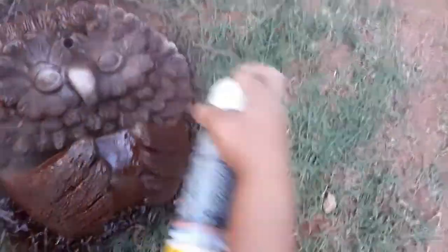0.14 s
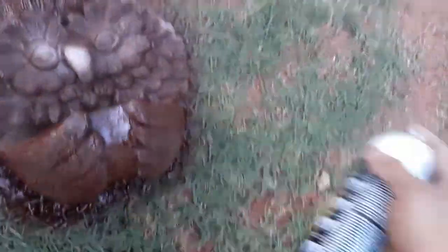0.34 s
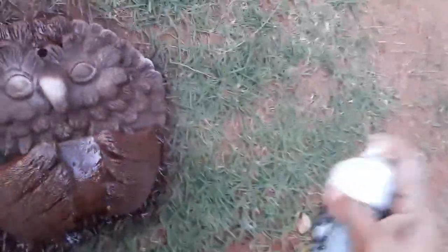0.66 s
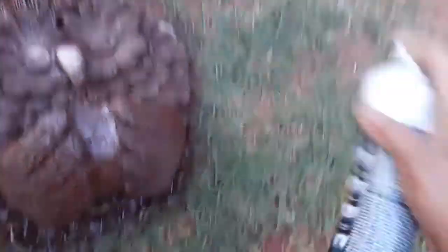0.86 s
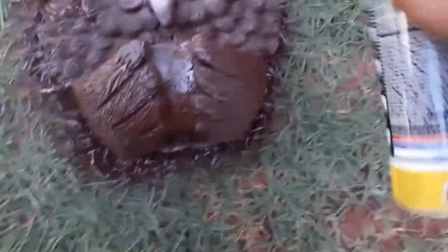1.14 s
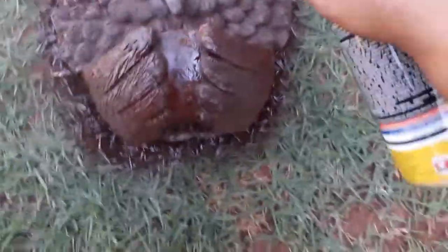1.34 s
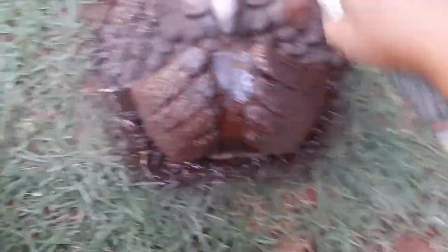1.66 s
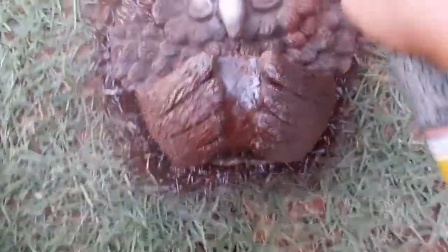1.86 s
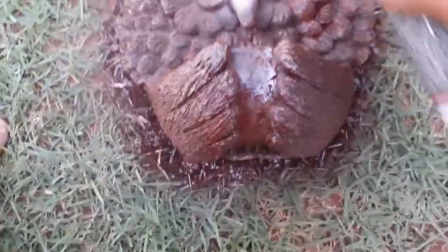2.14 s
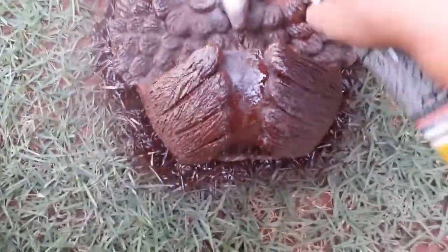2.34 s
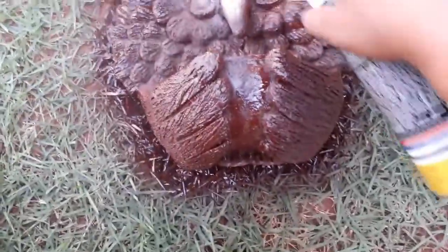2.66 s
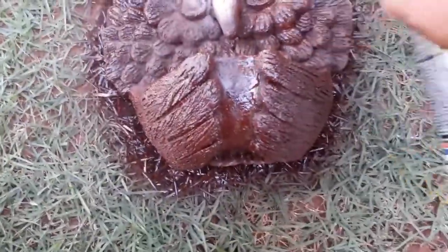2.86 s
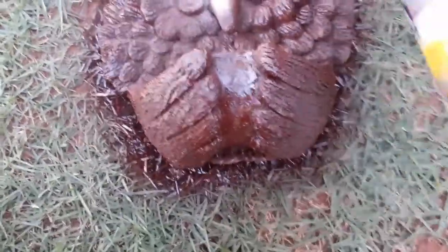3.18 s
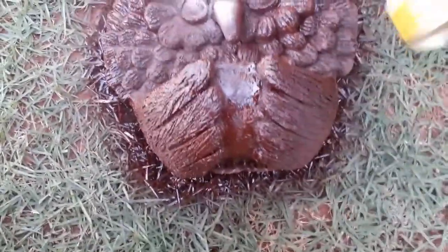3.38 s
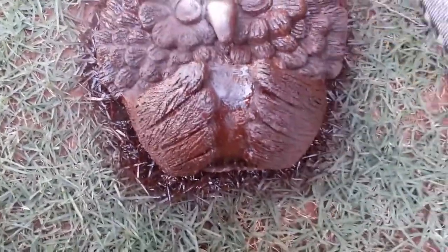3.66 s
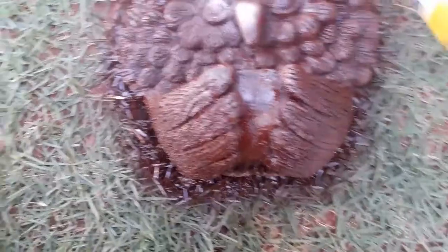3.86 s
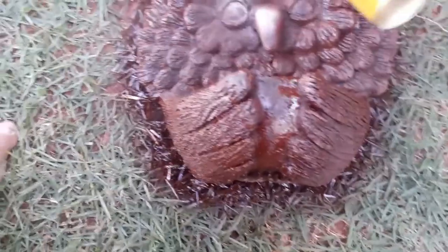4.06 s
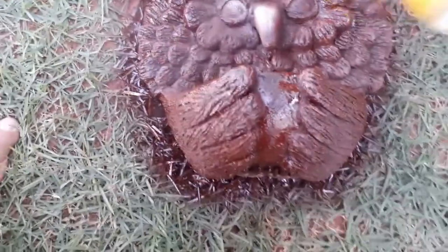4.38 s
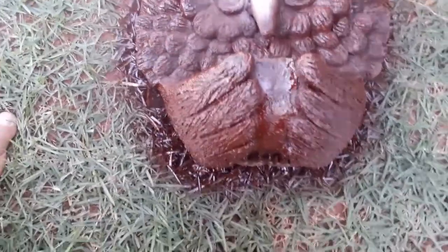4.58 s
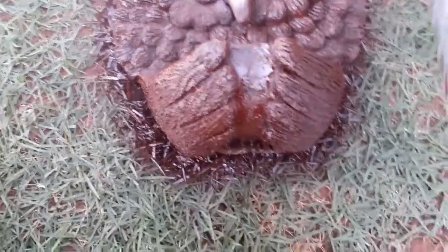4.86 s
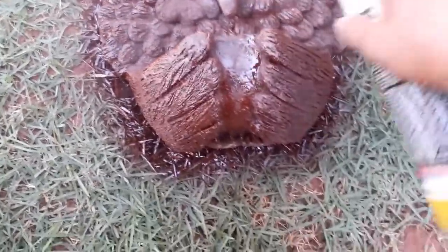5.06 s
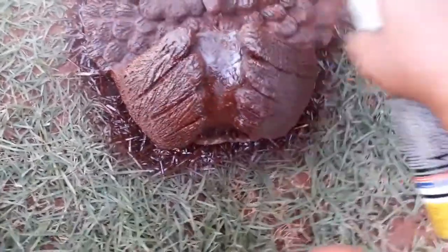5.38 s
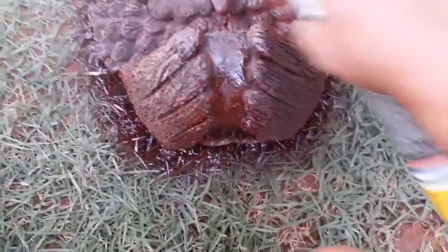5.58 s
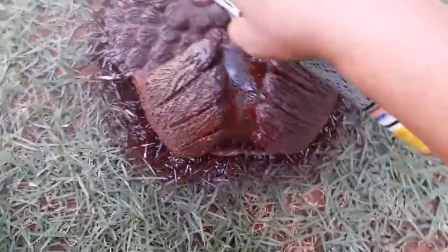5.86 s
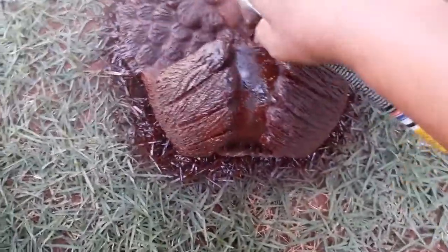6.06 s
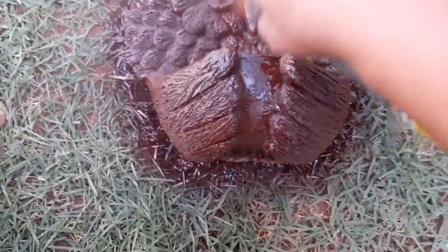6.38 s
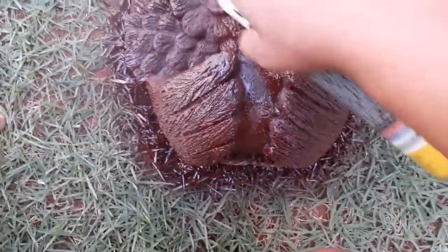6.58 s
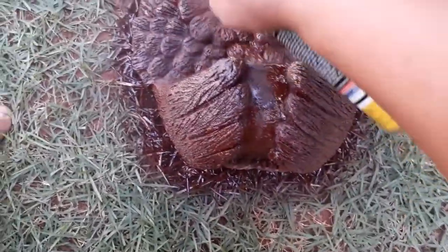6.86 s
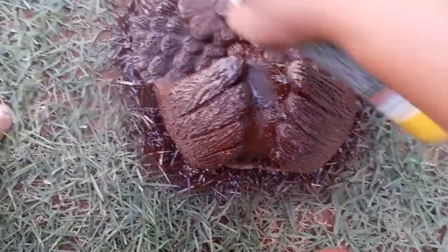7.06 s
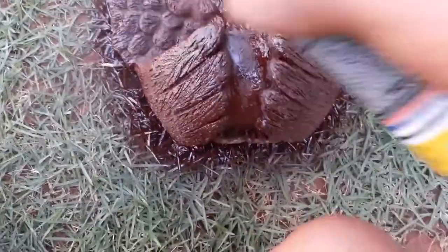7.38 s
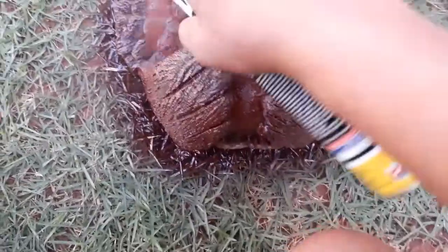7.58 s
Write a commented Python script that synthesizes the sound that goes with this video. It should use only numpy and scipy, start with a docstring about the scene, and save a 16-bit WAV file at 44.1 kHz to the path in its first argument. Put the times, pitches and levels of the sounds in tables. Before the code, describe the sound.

Outdoors on a lawn, a spray paint can is heard close up. Two tiny puffs and a loud flurry of hard ball rattles come first, then long bright hisses that start and stop abruptly. More sharp knocks sound during the hiss and in the short gaps. Underneath lie quiet yard air, a low distant hum and a few faint bird whistles. Same sound in both channels.

```python
"""Bursts of spray-can hiss with hard rattling knocks, over a low outdoor hum; faint bird whistles join.
A hand sprays a garden figure on a lawn: the hiss is moving-band noise, gated by the valve, echoed off the ground.
The mixing ball knocks and rolls on the paint-damped can: decaying wall modes, stirred-paint noise, fuzzy tones.
Yard air and hums are shaped noise; the whistles are blurred glides."""
import sys
import numpy as np
from scipy import signal
from scipy.io import wavfile
from scipy.ndimage import uniform_filter1d

SR = 44100
rng = np.random.default_rng(int(sys.argv[2]) if len(sys.argv) > 2 else 0)


def inscribe(sig):
    """Save sig as 16-bit PCM at rate SR to the path in sys.argv[1].

    A 1-D sig is mono; a 2-D sig holds one channel per row.
    Samples are clipped to [-1, 1] before scaling.
    """
    pcm = np.round(np.clip(np.atleast_2d(sig).T, -1, 1) * 32767)
    wavfile.write(sys.argv[1], SR, pcm.astype(np.int16))


N = 340804

# presses of the valve: fully open t/s, starts to close t/s
PRESSES = [(0.004, 0.078), (0.484, 0.562), (1.216, 2.549), (2.808, 4.68), (4.993, 5.697), (5.93, 6.582),
           (6.822, 7.158), (7.445, 7.8)]
# jet spectrum before colouring: f/Hz, relative density/dB per Hz
JET_SPECTRUM = [(120, -19), (300, -10), (520, -21), (750, -15.5), (1500, -12), (2550, -6.5), (3100, -7.5),
                (4100, -4.5), (5300, -4.5), (8500, -4), (9600, -3), (13600, -7), (16000, -10)]
# jet as the hand sweeps: t/s, level/dB, bass lift/dB, treble lift/dB, middle band lift/dB, high band f/Hz,
# high band lift/dB
SWEEP = [(0.04, -25.5, 3.5, -4, 9.5, 8830, 11.5), (0.484, -35.5, 10, 4, 2, 9370, 11),
         (0.562, -44.5, 11, 0, -8, 9050, 5), (1.216, -32, 4.5, 4, 2, 8400, 5),
         (1.43, -26.5, -1, -4, 2, 8750, 8.5), (1.67, -26, 9, 2.5, 8.5, 8350, 14),
         (1.99, -28.5, 12, 6, 9.5, 8240, 9), (2.1, -24, 6.5, 6, 9, 8560, 18.5),
         (2.31, -27, 4.5, 0, 5, 8470, 7), (2.4, -24.5, 8.5, 1, 6, 8450, 18),
         (2.55, -24.5, 6, 2.5, 8.5, 8430, 11.5), (2.81, -28, 3.5, 4, 2, 8500, 3),
         (2.97, -26, -2, -5.5, 8.5, 8650, 10.5), (3.16, -24, -2.5, -3, 10.5, 8570, 14.5),
         (3.47, -26, 1, 3.5, 11.5, 8660, 6.5), (3.66, -25, -2, -13, 9.5, 8600, 18),
         (3.84, -31.5, -4.5, 1.5, 13.5, 8550, 13.5), (4.2, -33.5, -4, 1, 4, 8800, 1),
         (4.5, -26, 4, 3.5, 12, 8700, 9), (4.68, -31, -3.5, -7.5, 6, 8900, 8),
         (4.993, -30.5, 8, 1, 10, 8820, 7), (5.1, -27.5, 1.5, -1.5, 8, 8700, 13),
         (5.26, -26.5, -1, -1, 2.5, 8900, 8), (5.33, -25, 10.5, 6, 6.5, 8640, 14),
         (5.62, -27.5, 3.5, 1.5, 5.5, 8400, 7.5), (5.695, -23, 8, 6, 9, 8760, 13),
         (5.93, -28.5, 2, -0.5, 5, 8610, 8.5), (6.14, -24.5, 7, 3, 12, 8360, 18),
         (6.34, -26.5, -4.5, 3, 4, 8160, 14), (6.58, -26, 6.5, -1.5, 4.5, 8460, 10),
         (6.82, -28, 3, -2, 8, 8850, 6), (6.9, -24, 2, -3, 7, 8700, 11), (7.03, -26, -8, -6, 2.5, 8750, 7),
         (7.156, -25, 2, -3, 8.5, 8710, 0), (7.445, -31.5, 13, 6, 6, 8800, 11),
         (7.48, -24.5, 4, 2.5, 8, 8670, 7.5), (7.73, -22.5, 9, 3.5, 11.5, 8480, 19)]
# lower bands of the jet as the can turns: t/s, low band f/Hz, low band lift/dB, middle band f/Hz
TURN = [(0.04, 5100, 10, 6800), (0.5, 4000, -1, 6600), (1.22, 4500, 11, 6500), (1.43, 4900, 3.5, 6550),
        (1.7, 3960, 3.5, 6600), (1.95, 4000, 6, 6200), (2.12, 4000, 4.5, 7060), (2.32, 4370, 1.5, 6160),
        (2.55, 4700, 8.5, 6740), (3.0, 4300, 1.5, 6470), (3.2, 4160, 6, 6400), (3.5, 3800, 7.5, 5970),
        (3.84, 4170, -1, 6250), (4.3, 4350, 8, 5900), (4.68, 4600, 1, 6500), (5.1, 4400, 5.5, 6200),
        (5.26, 4850, 4, 6550), (5.62, 3940, 6, 7000), (5.93, 4600, 2, 7000), (6.14, 3720, 9, 6900),
        (6.58, 4100, 3.5, 7100), (6.88, 4480, 10.5, 6950), (7.03, 3960, 5, 6650), (7.16, 4600, 4, 7030),
        (7.47, 4670, 9.5, 6900), (7.73, 4300, 6.5, 7000)]
# yard air spectrum: f/Hz, relative density/dB per Hz
AIR_SPECTRUM = [(15, -18), (48, -33), (58, -26), (100, -12.5), (130, -16), (260, -17), (420, -16.5),
                (600, -28.5), (754, -22.5), (1520, -26), (2600, -22.5), (9070, -32), (11500, -38),
                (16000, -55)]
# low hums: f/Hz, width (two standard deviations of power)/Hz, level/dB
HUMS = [(67.5, 8.5, -58), (155.3, 8.4, -59), (217.2, 20, -53.5), (295, 9.2, -61.5)]
# ball knocks: t/s, peak level/dB, then lifts by landing spot: thud/dB, ring/dB, clack/dB, snap/dB
KNOCKS = [(0.006, -2, -42, -7, -7, -13), (0.136, -3, -46, -20.5, -15, -12.5),
          (0.147, -30, -22, -12, -9, -15), (0.187, -1.5, -40, -10.5, -14, -21),
          (0.221, -9, -24, -7.5, -22, -22), (0.285, -15, -13.5, -16, -11, -14),
          (0.334, -24, -1, -15, -3, -26), (0.414, -25, -25, -25, -27, -18), (0.476, -28, -17, -20, -9, -24),
          (0.641, -15, -9, -19, -4, -13), (0.672, -23.5, -9, -7, -9, -11),
          (0.704, -14.5, -11, -14, -10, -18), (0.716, -16.5, -23, -10, -6, -14),
          (0.809, -4, -16, -7, -11, -9), (0.934, -6, -19, -13, -12, -14.5),
          (0.991, -13.5, -23, -8.5, -16, -17), (1.035, -15.5, -26, -6, -19, -19),
          (1.062, -17.5, -25, -3, -18, -14), (1.066, -5.5, -29, -9.5, -22, -16.5),
          (1.105, -17.5, -14, -12, -19, -13), (1.123, -17, -13, -2, -17, -17),
          (1.136, -23, -17, -8, -21, -23), (1.158, -28, -17, -4, -24, -11), (1.246, -12, -17, -9, -28, -18),
          (1.298, -14.5, -22.5, -17, -24, -11), (1.323, -16, -23, -17, -23, -14),
          (2.368, -17, -24, -16, -20, -20), (2.59, -34, -26, -14, -20, -18),
          (2.872, -18, -28, -15, -23, -12), (3.623, 0.5, -44, -23.5, -16, -13.5),
          (3.668, -16.5, -23, -36, -28, -20), (3.713, -23.5, -19.5, -26, -31, -16),
          (4.137, -7.5, -37, -20.5, -29, -20), (4.179, -18, -24, -18, -34, -11),
          (4.254, -7, -42, -21, -8, -10), (4.357, -6, -65, -36, -18, -15),
          (4.388, -11.5, -50, -38, -19, -18), (4.411, -12, -36, -36, -20, -18),
          (4.438, -15, -37, -35, -31, -22), (4.786, -39, -32, -3, -12, -18), (4.889, -5, -59, -9, -10, -17),
          (4.943, -15.5, -20, -11, -23, -17), (4.99, -19.5, -15, -10, -20, -18),
          (5.643, -17.5, -25, -16, -15, -21), (5.828, -38, -13, -8, -12, -13),
          (5.849, -34.5, -15, -16, -16, -10), (5.86, -31.5, -11, -11, -19, -14),
          (6.75, -29.5, -12, -33, -19, -20), (6.76, -31.5, -19, -22, -19, -17),
          (7.198, -34, -12, -5, -3, -5), (7.231, -21, -26, -16, -17, -16), (7.245, -27, -19, -18, -23, -17),
          (7.259, -31, -16, -13, -17, -15), (7.272, -34, -13, -10, -19, -12),
          (7.412, -30, -12, -10, -11, -9)]
# modes of the filled can: f/Hz, relative level/dB, decay scale/s (60 dB down after 0.8 of it)
CAN_MODES = [(495, -7, 0.022), (812, -6.5, 0.051), (950, -1, 0.026), (1196, -0.5, 0.018), (1464, 5, 0.01),
             (1890, 0, 0.012), (2416, 3.5, 0.015), (2643, 4.5, 0.013), (3037, -1, 0.015), (3425, 4, 0.0082),
             (4130, 3, 0.0084), (4930, 4, 0.0078), (5310, -6, 0.0066), (5720, -2, 0.011), (6730, 0, 0.005),
             (6760, 1.5, 0.0038), (8740, 0, 0.0089), (10460, 1, 0.0049), (12500, -12, 0.0039),
             (13100, -11, .004)]
# lift of the top modes, alike in every knock: f/Hz, lift/dB
TICK = [(7500, -14), (13000, -21.5)]
# ball rolling along the wall: t/s, length/s, rubbed mode f/Hz, level/dB
ROLLS = [(0.336, 0.018, 810, -45), (0.476, 0.026, 840, -45), (0.717, .025, 1010, -39),
         (5.711, 0.014, 2420, -36), (5.726, 0.012, 2400, -34), (5.737, 0.022, 2420, -38),
         (5.826, 0.008, 2550, -47), (5.849, 0.022, 2450, -50), (7.235, .05, 2510, -50.5)]
# bird whistles: t/s, length/s, start f/Hz, end f/Hz, level/dB
BIRDS = [(.775, .035, 4950, 5150, -52), (.825, .07, 4000, 3400, -56), (7.3, .05, 5050, 4800, -52),
         (7.365, .055, 3800, 3250, -53)]

OPEN_DB_PER_S, CLOSE_DB_PER_S = 900, 900
LOW_SIGMA_HZ, MIDDLE_SIGMA_HZ, HIGH_SIGMA_HZ = 370, 566, 350
ECHO_DB, ECHO_LAG_S, ECHO_LAG_RMS_S = -12.5, 0.0016, 0.000312
AIR_DB = -51.5
THUD_HZ, RING_HZ, CLACK_HZ, SNAP_HZ = 980, 2280, 3450, 4840
SLOSH_DB, SLOSH_T60_S, SLOSH_LAG_S = -27, 0.12, 0.0079  # level re knock peak, before the band-pass
BASS_CUT_HZ, BAND_LIMIT_HZ = 56, 15850


def amp(db):
    """Decibels to amplitude."""
    return 10 ** (np.asarray(db) / 20)


def evened(x):
    """Scale to unit RMS."""
    return x / np.sqrt(np.mean(x ** 2) + 1e-20)


def read(points, hz):
    """A dB curve joined by straight lines on a log-frequency axis."""
    f, value = np.transpose(points)
    return np.interp(np.log(hz + 1), np.log(f + 1), value)


def add(mix, start_s, sound):
    """Add a sound in place, cut at the end of the mix."""
    part = mix[round(start_s * SR):][:len(sound)]
    part += sound[:len(part)]


def frames(size):
    """Frequencies/Hz as a column and frame times/s of a short-time spectrum."""
    hz = np.fft.rfftfreq(size, 1 / SR)[:, None]
    frame_s = np.arange(4 * N // size + 5) * size / 4 / SR
    return hz, frame_s


def noise(db, size, patch_db):
    """Noise from a dB field over frequency and time, with drifting patches."""
    real, imag, patches = rng.standard_normal((db.shape[1], db.shape[0], 3)).T
    patches = uniform_filter1d(patches, size=7, axis=0)  # across frequency
    patches = evened(uniform_filter1d(patches, size=20, axis=1))  # across time
    spectrum = (real + 1j * imag) * amp(db + patch_db * patches)
    return signal.istft(spectrum, nperseg=size, noverlap=size * 3 // 4)[1][:N]


def fuzzy(hz, db, steady, size):
    """A tone along hz whose size and phase wander quickly; steady is the unvarying share."""
    blur = uniform_filter1d(rng.standard_normal((2, len(hz))), size=size)
    wander = steady + evened(blur[0]) + 1j * evened(blur[1])
    tone = (wander * np.exp(2j * np.pi * np.cumsum(hz) / SR)).real
    return amp(db) * evened(tone) * signal.windows.tukey(len(hz), 0.4)


def drift(t, slow_hz, fast_hz):
    """Slow chance from a dozen sines of random phase, unit RMS."""
    rates_hz = np.geomspace(slow_hz, fast_hz, 12)
    return evened(sum(np.sin(2 * np.pi * (f * t + rng.random())) / np.sqrt(f) for f in rates_hz))


def valve(t):
    """Gain of the presses: the hiss swells and dies linearly in dB."""
    gain = np.zeros(len(t))
    for open_s, close_s in PRESSES:
        before_s, after_s = np.maximum(open_s - t, 0), np.maximum(t - close_s, 0)
        gain += amp(-OPEN_DB_PER_S * before_s - CLOSE_DB_PER_S * after_s)
    return gain


def spray():
    """Jet noise whose bands move as nozzle, hand and figure change the short echoes."""
    hz, frame_s = frames(size=512)
    sweep_s, level_db, *colour = np.transpose(SWEEP)
    bass_db, treble_db, middle_db, high_hz, high_db = (np.interp(frame_s, sweep_s, c) for c in colour)
    turn_s, *bands = np.transpose(TURN)
    low_hz, low_db, middle_hz = (np.interp(frame_s, turn_s, c) for c in bands)

    db = read(JET_SPECTRUM, hz) + bass_db / (1 + (hz / 2600) ** 4)
    db += treble_db / (1 + (10500 / (hz + 1)) ** 8)
    for centre_hz, sigma_hz, lift_db in ((low_hz, LOW_SIGMA_HZ, low_db),
                                         (middle_hz, MIDDLE_SIGMA_HZ, middle_db),
                                         (high_hz, HIGH_SIGMA_HZ, high_db)):
        db += lift_db * np.exp(-0.5 * ((hz - centre_hz) / sigma_hz) ** 2)
    db -= 10 * np.log10((amp(db) ** 2).sum(0))  # equal power per frame: colour leaves the level alone

    # liquid spits unevenly
    droplets = amp(0.87 * evened(uniform_filter1d(rng.standard_normal(N), size=60)))
    hiss = evened(noise(db, size=512, patch_db=2.0) * droplets)
    t = np.arange(N) / SR
    return valve(t) * amp(np.interp(t, sweep_s, level_db)) * hiss


def lawn(x):
    """An echo off the ground whose lag drifts as the hand sweeps."""
    t = np.arange(N) / SR
    lag_s = ECHO_LAG_S + ECHO_LAG_RMS_S * drift(t, slow_hz=0.2, fast_hz=1.8)
    return x + amp(ECHO_DB) * np.interp(t - lag_s, t, x)


def yard():
    """Steady outdoor air with a few fuzzy low hums from distant machines."""
    hz, frame_s = frames(size=4096)
    still = 0 * frame_s  # spreads a spectrum over all frames
    air = evened(noise(read(AIR_SPECTRUM, hz) + still, size=4096, patch_db=4.5))
    hum_power = sum(amp(db) ** 2 / width * np.exp(-2 * ((hz - f) / width) ** 2) for f, width, db in HUMS)
    hum_db = 10 * np.log10(sum(amp(db) ** 2 for f, width, db in HUMS))
    hum = evened(noise(10 * np.log10(hum_power + 1e-30) + still, size=4096, patch_db=2.0))
    return amp(AIR_DB) * air + amp(hum_db) * hum


def slosh(grit, t):
    """Paint stirred by a knock falls back a moment later: decaying band-passed noise."""
    band = signal.butter(2, [1600, 5000], "bandpass", fs=SR, output="sos")
    late_s = np.maximum(t - SLOSH_LAG_S, 0)
    envelope = amp(SLOSH_DB - 60 * late_s / SLOSH_T60_S) * (1 - np.exp(-late_s / 0.0015))
    return signal.sosfilt(band, grit) * envelope


def ball():
    """Each knock is a short rough contact that rings the wall and stirs the paint."""
    out, t = np.zeros(N), np.arange(6000) / SR
    hz, mode_db, decay_s = np.transpose(CAN_MODES)[:, :, None]
    for start_s, peak_db, thud_db, ring_db, clack_db, snap_db in KNOCKS:
        spot, tune, lag = rng.standard_normal((3, len(CAN_MODES), 1))
        grit = rng.standard_normal(len(t))
        # modes start as the contact spreads
        age_s = np.maximum(t[:1800] - 0.0006 - 0.000307 * abs(lag), 0)
        lift_db = read([(THUD_HZ, thud_db), (RING_HZ, ring_db), (CLACK_HZ, clack_db),
                        (SNAP_HZ, snap_db), *TICK], hz)
        # paint closes on the wall and damps ever harder
        spent = age_s / decay_s
        fade_db = 30 * (spent + 1.9 * spent ** 2)
        size = amp(mode_db + lift_db + 2.0 * spot - fade_db) * (1 - np.exp(-age_s / 0.00027))
        tuned_hz = hz * (1 + 0.028 * tune)
        ring = (size * np.sin(2 * np.pi * tuned_hz * age_s)).sum(0)
        ring *= 1 + 0.21 * uniform_filter1d(grit[:1800], size=4)  # the contact chatters
        add(out, start_s, amp(peak_db) * ring / abs(ring).max())
        add(out, start_s, amp(peak_db) * slosh(grit, t))
    return out


def rolling():
    """The rolling ball keeps one wall mode sounding: a fuzzy fixed tone."""
    out = np.zeros(N)
    for start_s, length_s, hz, db in ROLLS:
        pitch_hz = np.full(round(length_s * SR), hz)
        add(out, start_s, fuzzy(pitch_hz, db, steady=3.5, size=150))
    return out


def birds():
    """Short gliding whistles, blurred by distance."""
    out = np.zeros(N)
    for start_s, length_s, from_hz, to_hz, db in BIRDS:
        glide_hz = np.linspace(from_hz, to_hz, round(length_s * SR))
        add(out, start_s, fuzzy(glide_hz, db, steady=0.79, size=110))
    return out


def scene():
    """One microphone feeds both channels."""
    mono = lawn(spray()) + yard() + ball() + rolling() + birds()
    return np.array([mono, mono])


def record(dry):
    """The microphone drops the deep bass; hard clipping, then the band limit."""
    bass_cut = signal.butter(3, BASS_CUT_HZ, "highpass", fs=SR, output="sos")
    clipped = np.clip(signal.sosfilt(bass_cut, dry), -0.95, 0.95)
    band_limit = signal.firwin(511, BAND_LIMIT_HZ, window=("kaiser", 9), fs=SR)
    return signal.oaconvolve(clipped, band_limit[None], "same")


dry = scene()
out = record(dry)
inscribe(out)
```